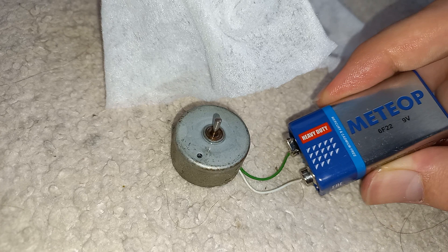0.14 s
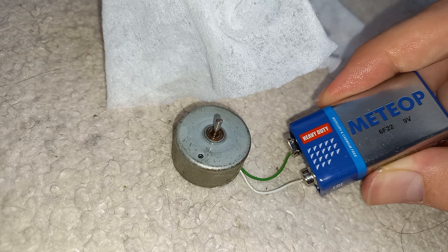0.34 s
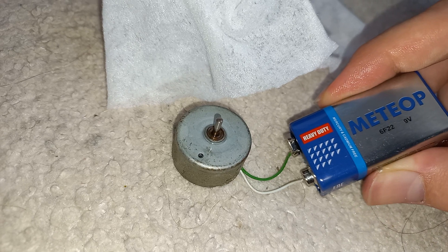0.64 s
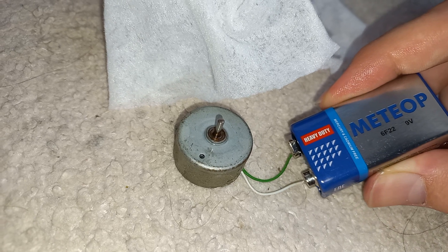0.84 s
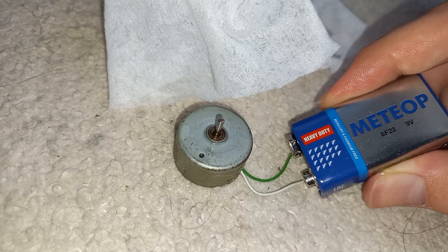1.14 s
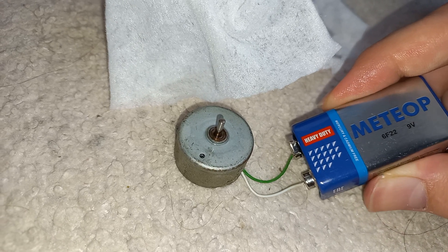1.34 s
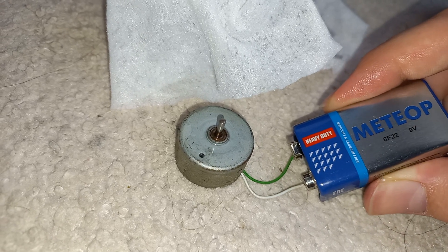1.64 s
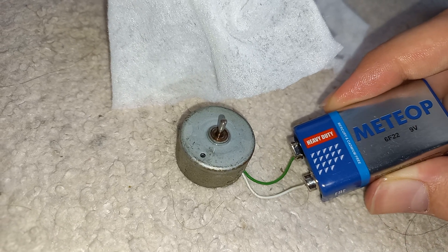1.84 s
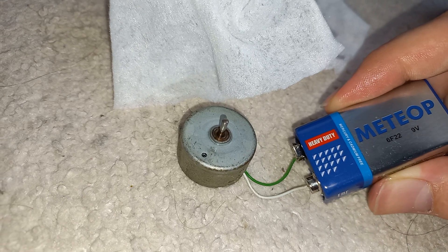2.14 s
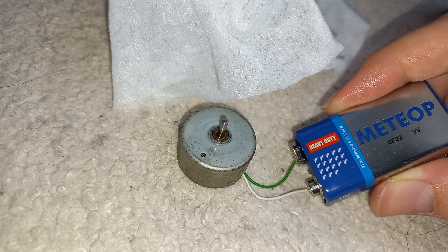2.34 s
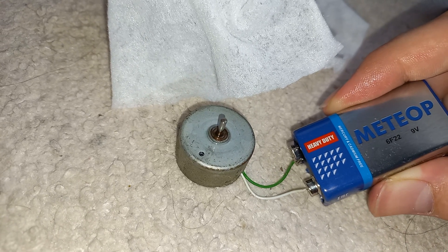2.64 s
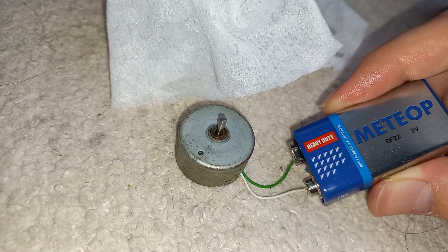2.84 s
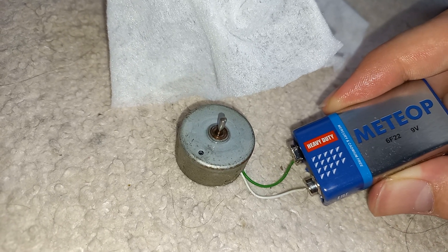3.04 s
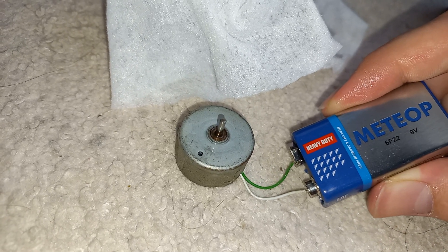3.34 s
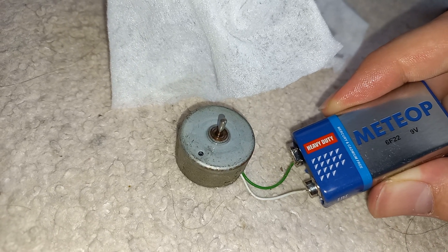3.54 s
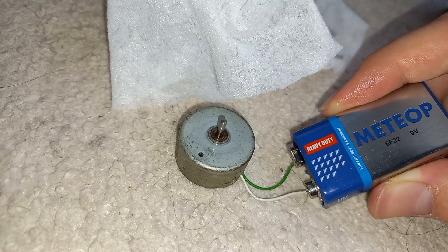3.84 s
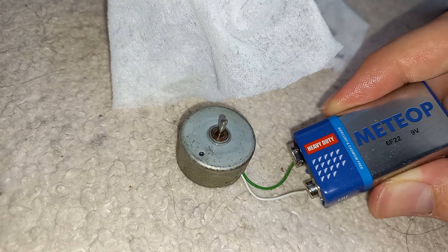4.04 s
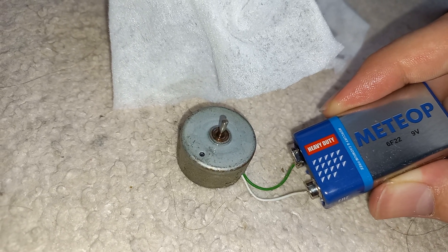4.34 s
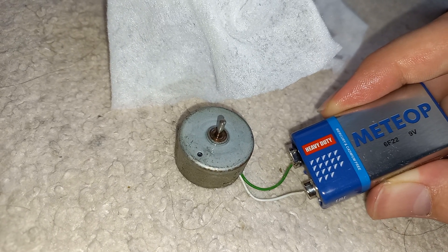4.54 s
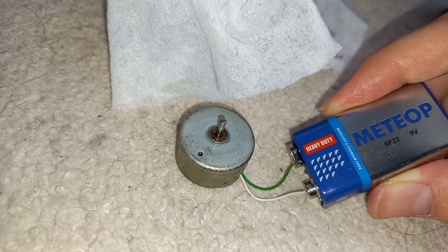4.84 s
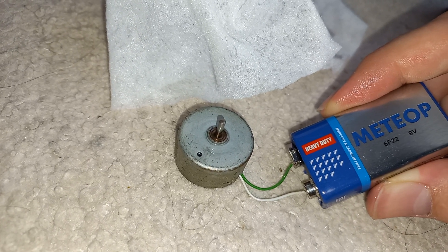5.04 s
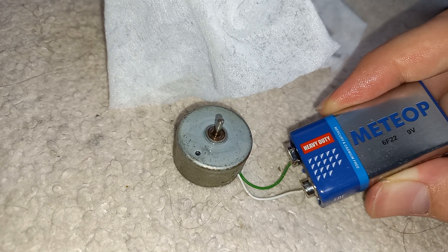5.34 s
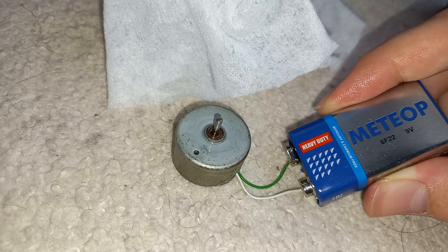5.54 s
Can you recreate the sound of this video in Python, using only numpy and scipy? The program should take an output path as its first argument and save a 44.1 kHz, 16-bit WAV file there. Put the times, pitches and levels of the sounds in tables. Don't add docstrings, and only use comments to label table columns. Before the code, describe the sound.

A small bare electric motor whirs faintly in a quiet room, letting out a piercing dry-bearing squeal about once a second, with tiny rattling ticks between.

```python
import sys
import numpy as np
from scipy import signal
from scipy.fft import rfft, irfft, next_fast_len
from scipy.io import wavfile
from scipy.ndimage import uniform_filter1d

SR = 44100
rng = np.random.default_rng(int(sys.argv[2]) if len(sys.argv) > 2 else 0)


def waveform_to_disk(signal):
    frames = np.transpose(np.atleast_2d(signal))
    scaled = np.clip(frames, -1, 1) * 32767
    samples = np.round(scaled).astype(np.int16)
    wavfile.write(sys.argv[1], SR, samples)


def invert_db(x):
    u = np.asarray(x, float) / 20
    return 10 ** u


N = 251370

# start in seconds, end in seconds, pitch in Hz,
# and at the start the shaft speed in turns per second and the shaft angle in turns.
SQUEALS = [
    (0.358, 0.524, 3059, 62, .17),
    (1.251, 1.41, 3031, 61.8, .44),
    (2.09, 2.237, 3010, 59.2, -.13),
    (3.085, 3.21, 3002, 58.3, -.06),
    (3.935, 4.065, 3004, 60.7, -.26),
    (4.92, 5.053, 2999, 60.1, .54),
    (5.597, 5.708, 2985, 59.6, .23),
]
# end in seconds, pitch in Hz, level in dB,
# level in dB of the knock as the shaft lets go.
GROANS = [
    (.587, 1963, -34.5, -44.5),
    (1.469, 1941, -34.5, -41.5),
    (2.258, 1900, -38, -41.5),
    (3.265, 1961, -35, -43.5),
    (4.116, 1953, -36, -46.5),
    (5.061, 1900, -57, -45.5),
    (5.8, 2092, -32, -44),
]


def rms_one(x):
    return x / np.sqrt(np.mean(x ** 2) + 1e-20)


def wander(rate_hz, size=N):
    low_pass = signal.butter(4, rate_hz, fs=SR, output="sos")
    settling = 4000
    noise = rng.standard_normal(size + settling)
    return rms_one(signal.sosfilt(low_pass, noise)[settling:])


def resonate(x, modes):
    out = 0
    for k, (hz, width_hz, level_db) in enumerate(modes):
        r = np.exp(-np.pi * width_hz / SR)
        feedback = [1, -2 * r * np.cos(2 * np.pi * hz / SR), r * r]
        ringing = signal.lfilter([(1 - r * r) / 2, 0, (r * r - 1) / 2], feedback, x)
        out = out + (-1) ** k * invert_db(level_db) * ringing
    return out


def coloured(x, points, lag=0):
    size = next_fast_len(N + 2048)
    table = np.array(points)
    log_hz, log_points = np.log(np.arange(size // 2 + 1) * SR / size + 1), np.log(table[:, 0])
    gain = invert_db(np.interp(log_hz, log_points, table[:, 1]))
    turn = np.interp(log_hz, log_points, table[:, -1]) * lag
    return irfft(rfft(x, size) * gain * np.exp(-1j * turn), size)[:N]


def grains(per_s, spread_db):
    sizes = invert_db(spread_db * np.minimum(rng.exponential(1, N), 4)) * rng.choice([-1, 1], N)
    return rms_one(sizes * (rng.random(N) < per_s / SR))


def room_and_hiss(gain):
    # frequency in Hz, level in dB per Hz.
    room_colour = [(18, -46.5), (35, -31.5), (60, -7.5), (90, -1.5), (200, -5), (500, -10.5), (800, -17),
                   (1400, -14), (4000, -10), (9500, -26.5), (10300, -25), (10800, -20.5), (15800, -24)]
    # frequency in Hz, level in dB.
    right_hiss = [(1000, -3.5), (3200, -9), (5000, 0), (9300, -16), (10500, -6), (14300, 0.5), (15300, 7.5)]
    air = [rms_one(coloured(rng.standard_normal(N), room_colour)) for side in range(2)]
    floor = invert_db(-69.5) * np.array([air[0], coloured(air[1], right_hiss)])
    lows = signal.sosfilt(signal.butter(4, 1500, fs=SR, output="sos"), floor)
    shaken = invert_db(2.4 * np.clip(uniform_filter1d(gain, size=4000) / 0.023, 0, 1))
    ducking = 1 + uniform_filter1d(gain, size=900) / 0.00043
    return shaken * lows + (floor - lows) / ducking


def shaft():
    free_speed, dragged_speed = 69, 8.8
    brake_s, recovery_s = .13, .2
    t = np.arange(N) / SR
    turns = 66 * t
    for start, end, _, speed, angle in SQUEALS:
        now = t[t >= start]
        gripped_s = np.minimum(now, end) - start
        braked = dragged_speed + (speed - dragged_speed) * np.exp(-gripped_s / brake_s)
        regained = 1 - np.exp(-np.maximum(now - end, 0) / recovery_s)
        turns[t >= start] = angle + np.cumsum(braked + (free_speed - braked) * regained) / SR
    return 2 * np.pi * turns


def tightness_db():
    loose_db, tight_db, wander_db = -71.5, -64, 1.5
    s = np.ravel([(start, stop) for (start, *_), (stop, *_) in zip(SQUEALS, GROANS)])
    ramp = np.interp(np.arange(N) / SR, [-.2, *s], np.resize([loose_db, tight_db], len(s) + 1))
    return ramp + wander_db * wander(8.3)


def rubbing(angle, gain):
    # frequency in Hz, width in Hz, level in dB.
    rubbed_modes = [(2630, 856, -20.5), (4390, 730, -17), (5040, 1630, -23.5), (6500, 770, -25.5),
                    (7310, 500, -19), (8674, 900, -18.5), (9980, 440, -27.5)]
    level_db = tightness_db()
    free = 1 / (1 + gain / .0005)
    turn = np.floor(angle / (2 * np.pi) + .5).astype(int) % 128
    chance = rng.standard_normal(128)[turn]
    brush = invert_db(level_db + np.clip(2.2 * chance, -9, 5)) * np.exp(4.1 * (np.cos(angle) - 1))
    steady = invert_db(-67.5 + 0.61 * (level_db + 66.5))
    out = []
    for hz in (1950, 2090):
        friction = free * grains(12000, 3.8)
        ringing = resonate(friction * (brush * invert_db(7.5) + steady * invert_db(-2.5)), [(hz, 105, 1.2)])
        ringing = resonate(ringing, [(hz, 380, 1.5)])
        hiss = resonate(friction * (brush * invert_db(6.0) + steady * invert_db(4.5)), rubbed_modes)
        out.append(invert_db(20) * (ringing + hiss))
    return out


def knocks():
    # first knock in seconds, length in seconds, level in dB,
    # fall of the last knock in ms.
    bouts = [(0.353, 0.0019, -43.5, 2.8), (1.241, 0.0022, -41.5, 5.2), (2.06, 0.025, -39, 6),
             (2.484, 0, -43.5, 2.03), (2.52, .005, -44.5, 5.2), (2.746, .039, -39, 4.8),
             (3.038, .006, -40.5, 3.5), (3.056, .024, -38.5, 3.8), (3.923, 0.00075, -39, 5.6),
             (4.642, 0.0025, -39.5, 2.2), (4.659, 0.0092, -38, 5.6), (4.809, 0.0021, -39, 5.2),
             (4.911, 0.00058, -43, 3.4), (5.589, 0.00079, -45.5, 2.4)]
    gap_s = .0085
    first_swell_ms, swell_ms, fall_ms, let_go_fall_ms = 3.28, 2.17, 2.53, 3.8
    rows = [(stop - .0025, knock_db, first_swell_ms, let_go_fall_ms) for stop, *_, knock_db in GROANS]
    for first, length, level_db, last_ms in bouts:
        shares = np.linspace(0, 1, 1 + round(length / gap_s))
        for share in shares:
            rise_db = 0.93 * (2 * share - 1) * (length > 0)
            swell = swell_ms if share else first_swell_ms
            fall = last_ms if share == shares[-1] else fall_ms
            rows.append((first + length * share, level_db + rise_db, swell, fall))
    return rows


def chatter(groan):
    # frequency in Hz, width in Hz, level in dB.
    can_modes = [(1595, 144, 0), (2193, 232, 1.5), (2980, 548, -5.5), (4650, 1100, -16.5),
                 (6400, 1030, -17), (7350, 812, -11), (8990, 680, -7), (12100, 770, -21),
                 (15100, 3120, -22.5)]
    ms = 1000 * np.arange(N) / SR
    strength = invert_db(-22.0) * groan
    for s, level_db, swell_ms, fall_ms in knocks():
        near = slice(round((s - .03) * SR), round((s + .05) * SR))
        late = ms[near] - 1000 * s
        strength[near] += invert_db(level_db) * np.exp(np.where(late < 0, late / swell_ms, -late / fall_ms))
    return [invert_db(17.5) * resonate(strength * grains(3500, 4.0), can_modes) for part in range(2)]


def grip(catch_s=0.0063, slip_s=0.0038, fade_s=0.0024):
    squeal_db, tiring_db_per_s = -27, -0.28
    sag_to_hz, sag_s = 1375, .6
    droop_hz, droop_s = 110, .0025
    dip_hz, settle_s = 109.5, .016
    lift_hz, lift_s = 158.6, 0.0056
    swell_depth_db, clear_s, beat_s = 7, 0.024, 0.039
    t = np.arange(N) / SR
    hz = np.full(N, 2000.)
    gain, low, swell_db = np.zeros((3, N))
    for (start, end, high_hz, *_), (stop, low_hz, low_db, _) in zip(SQUEALS, GROANS):
        on = (t > start - catch_s - fade_s) & (t < stop + fade_s)
        now = t[on]
        high = np.interp(now, [start - catch_s - .002, start - .002, end, end + slip_s], [0, 1, 1, 0])
        steady = sag_to_hz + (high_hz - sag_to_hz) * np.exp(-np.clip(now - start, 0, end - start) / sag_s)
        steady = steady - droop_hz * np.exp(np.minimum(now - end, 0) / droop_s)
        dip = dip_hz * (now > end) * np.exp(-(3.0 * (now - end - settle_s) / settle_s) ** 2)
        groan = low_hz - dip + lift_hz * np.exp(np.minimum(now - stop, 0) / lift_s)
        hz[on] = groan + (steady - groan) * np.sqrt(high)
        edge = np.interp(now, [start - catch_s - fade_s, start - catch_s, stop - fade_s, stop + fade_s],
                         [0, 1, 1, 0])
        beat = np.cos(2 * np.pi * (now - stop + clear_s) / beat_s)
        swell_db[on] = swell_depth_db * beat * (1 - high) * (now > end)
        high_db = squeal_db + tiring_db_per_s * start
        gain[on] = edge * invert_db(high ** 0.31 * high_db + (1 - high ** 0.48) * low_db)
        low[on] = 1 - high
    return hz, gain, low, swell_db


def squeal(angle, hz, gain, low, swell_db):
    # times a turn, depth in Hz, phase in rad.
    bends = [(1, 11, -2.55), (2, 30, 1.6), (3, 10, 2.0), (5, 16, .6)]
    # multiple of the pitch, squeal level in dB, groan level in dB, swing in dB once a turn,
    # phase of the swing in rad, change in dB per Hz of wobble.
    overtones = [(1, 0.07, -3.5, 2.5, 1.07, 0.0826), (2, -28, -11, 3.5, 3.5, -0.09),
                 (3, -15.5, -18.5, -2.5, 4, 0.21), (4, -1.2, -9, 1.45, 3.5, 0.07),
                 (5, -26, -24, 6.5, 1.7, 0.14), (6, -28, -20, 4, 6, 3), (7, -36, -27, 2.1, -2, 2),
                 (8, -41, -29, 2.1, 1.4, .011)]
    spin_shift = {2: 2, 4: 5, 5: 4}
    on, size = gain > 0, 70000
    angle, hz, gain, low, swell_db = angle[on], hz[on], gain[on], low[on], swell_db[on]
    rates_hz = (69.5, 277, 450, 350, 370, 356)
    drift, tremble, shake, *flutter = [wander(rate, size=size)[:len(hz)] for rate in rates_hz]
    wobble = (1 - low) * sum(depth * np.cos(times * angle + phase) for times, depth, phase in bends)
    jitter = 4.7 * tremble + low * (25 * drift + 55 * shake)
    phase = 2 * np.pi * np.cumsum(hz + wobble + jitter) / SR
    slowed = np.clip((3250 - hz) / 370, 0, 1.6) * (1 - low)
    fuzz = wander(540, size=size)[:len(hz)]
    spin = np.cumsum(np.clip(np.gradient(angle), 0, .02))
    out = np.zeros((2, N))
    for k, (multiple, high_db, low_db, swing_db, offset, slope) in enumerate(overtones):
        level_db = high_db + (low_db - high_db) * low + np.clip(slope * wobble, -12, 9)
        level_db = level_db - (0.88 + 0.36 * k) * slowed + swell_db * (k == 0)
        shift = spin_shift.get(k + 1, 0)
        audible = np.clip((16500 - multiple * hz) / 500, 0, 1)
        partial = gain * audible * np.sin(multiple * phase + shift * spin + k)
        partial = partial * (1 + fuzz * np.clip(-high_db - 20.0, 0, 14) * 0.081)
        for side, seen_from in enumerate([0, -1.85]):
            swing = swing_db * slowed * np.cos(angle + offset + seen_from)
            rough_db = (0.25 + 0.47 * k + 0.79 * side + (1 + 0.51 * k) * low) * flutter[(k + side) % 3]
            out[side, on] += invert_db(level_db + swing + rough_db) * partial
    return out


def reflections(x, t60=.2, level_db=-26):
    t = np.arange(round(.2 * SR)) / SR
    tails = rng.standard_normal((2, len(t))) * invert_db(-60 * t / t60) * np.clip((t - .003) / 0.015, 0, 1)
    tails /= np.sqrt(np.sum(tails ** 2, axis=1, keepdims=True))
    return invert_db(level_db) * signal.fftconvolve(x[None], tails, axes=1)[:, :N]


def scene():
    # frequency in Hz, level in dB.
    favoured = [(1350, -14), (1750, 0), (2600, -0.6), (3000, 1), (3200, -1.5), (9800, 0.25), (10900, -3.5),
                (11750, 2), (12300, 1), (12700, -14), (13500, -1.5)]
    # frequency in Hz, level in dB, lag in rad.
    right_path = [(1140, 0, 1), (1900, -7, 2), (2240, -6, 2), (2680, -7.5, 1.5), (2900, -18.5, 2),
                  (3300, -24.5, -3.5), (3963, 4.5, -2), (5510, 0, -5), (8060, 0.32, -8), (9120, -13.5, -8),
                  (10940, 3.5, -9), (11184, -12, -8), (11270, -7.5, -9), (12540, -4, -8.5)]
    angle = shaft()
    hz, gain, low, swell_db = grip()
    rub, other_rub = rubbing(angle, gain)
    rattle, other_rattle = chatter(gain * low)
    tone = [coloured(side, favoured) for side in squeal(angle, hz, gain, low, swell_db)]
    left = tone[0] + rattle + rub
    right = tone[1] + 0.51 * (rattle + rub) + 0.9 * (other_rattle + other_rub)
    small_body = signal.butter(5, 1100, "high", fs=SR, output="sos")
    left, right = signal.sosfilt(small_body, [left, right])
    motor = np.array([left, coloured(right, right_path, lag=True)])
    return motor + reflections(left) + room_and_hiss(gain)


def band_limit(x):
    return signal.sosfilt(signal.butter(12, 16660, fs=SR, output="sos"), x)


def record(dry):
    steep_cut = signal.ellip(12, .5, 60, 15740, fs=SR, output="sos")
    mix = signal.sosfilt(steep_cut, dry)
    return band_limit(mix)


dry = scene()
out = record(dry)
waveform_to_disk(out)
```